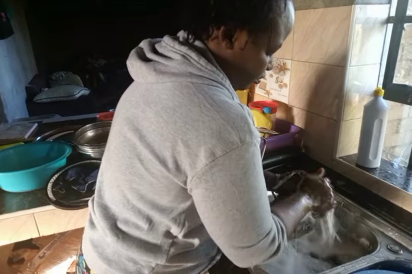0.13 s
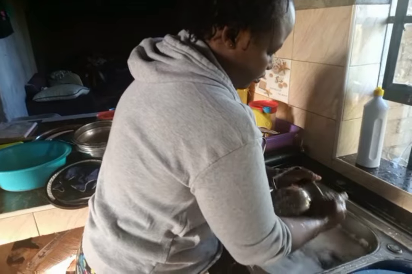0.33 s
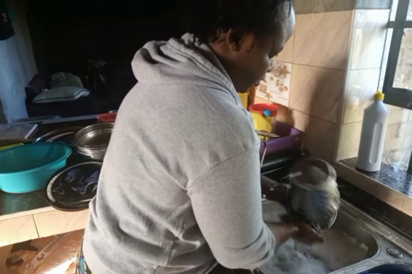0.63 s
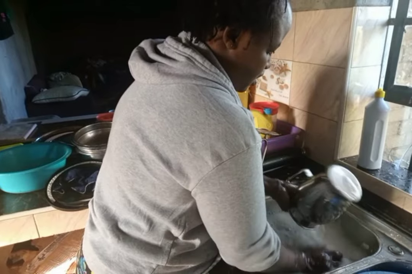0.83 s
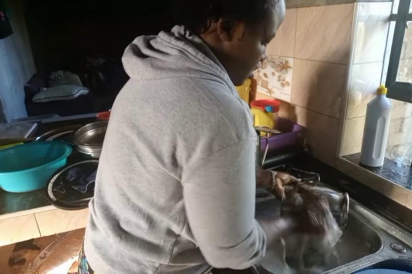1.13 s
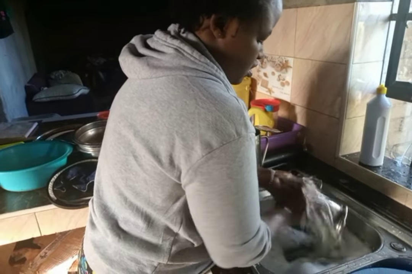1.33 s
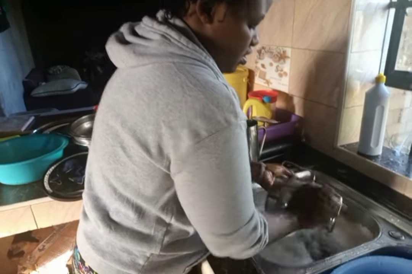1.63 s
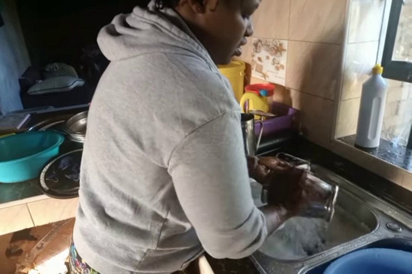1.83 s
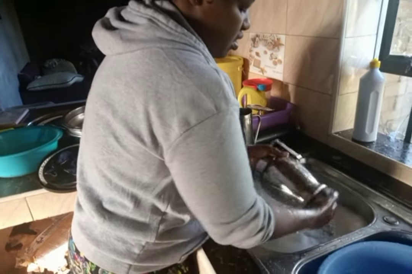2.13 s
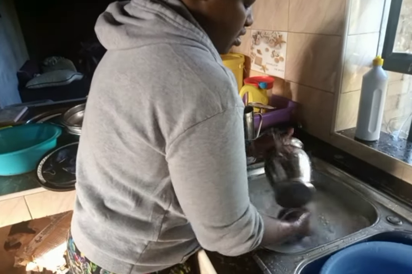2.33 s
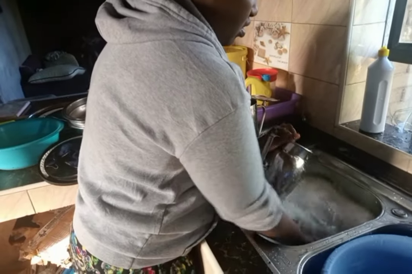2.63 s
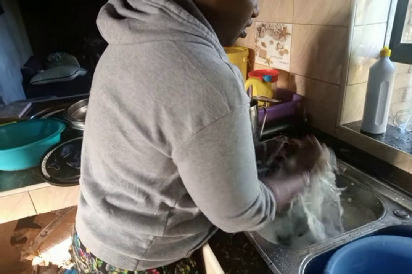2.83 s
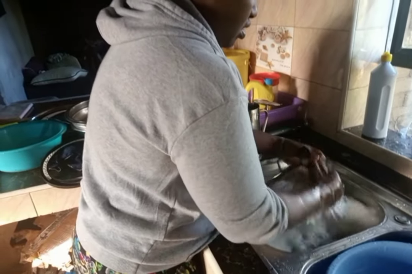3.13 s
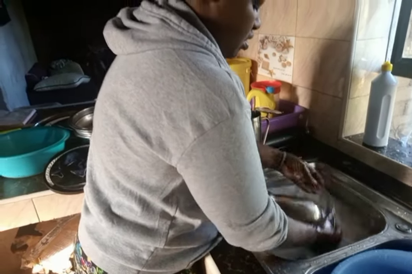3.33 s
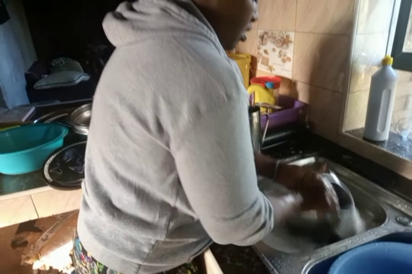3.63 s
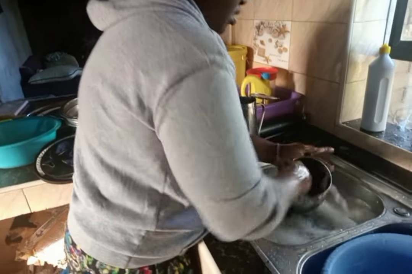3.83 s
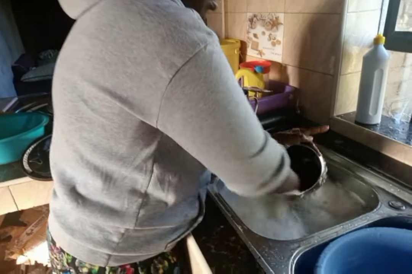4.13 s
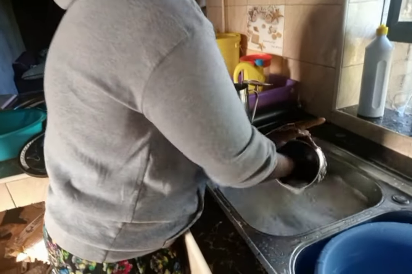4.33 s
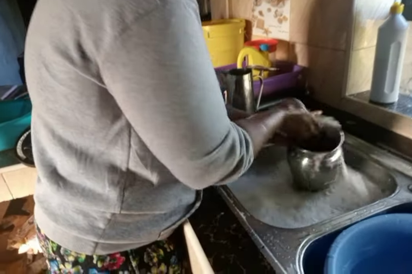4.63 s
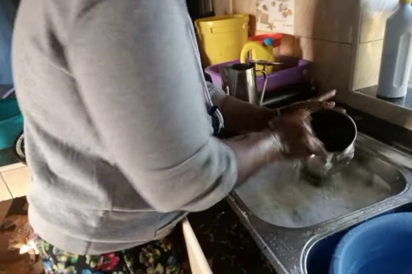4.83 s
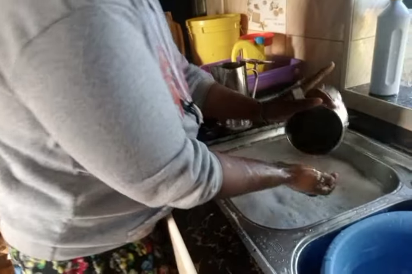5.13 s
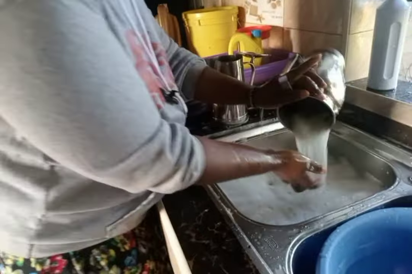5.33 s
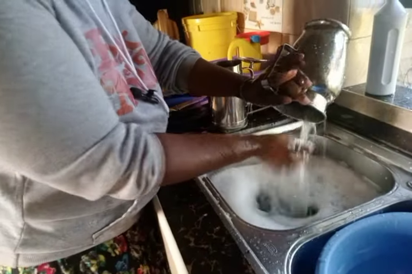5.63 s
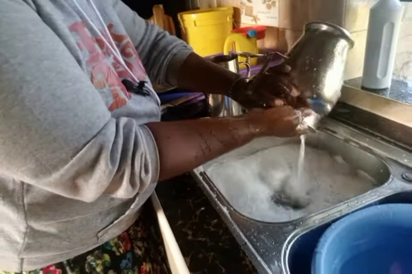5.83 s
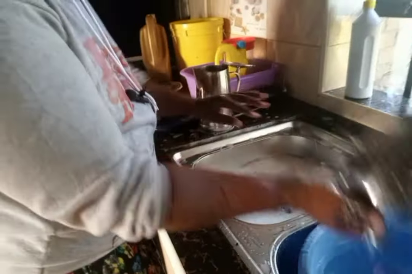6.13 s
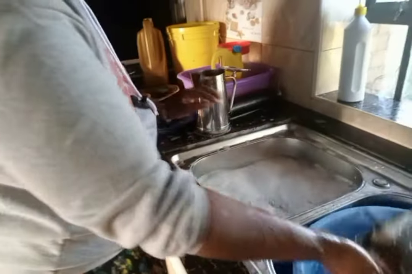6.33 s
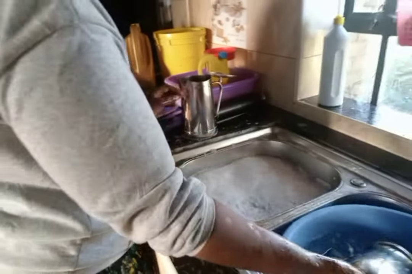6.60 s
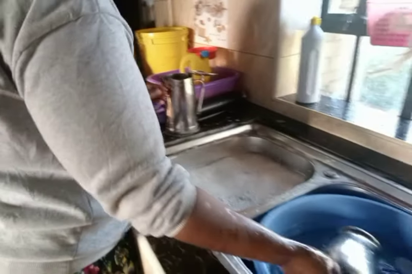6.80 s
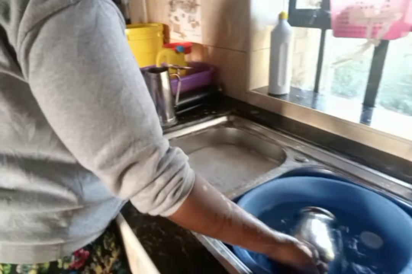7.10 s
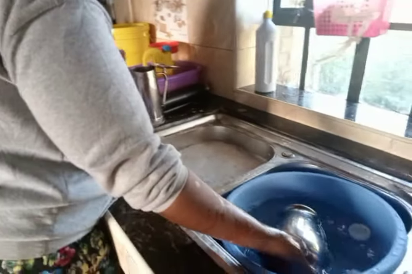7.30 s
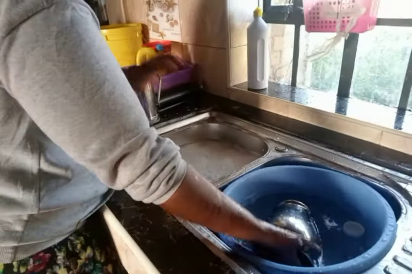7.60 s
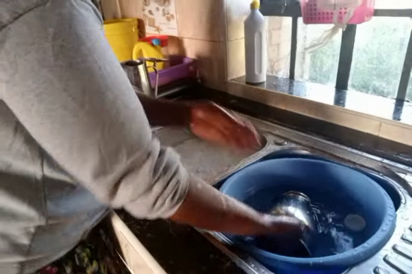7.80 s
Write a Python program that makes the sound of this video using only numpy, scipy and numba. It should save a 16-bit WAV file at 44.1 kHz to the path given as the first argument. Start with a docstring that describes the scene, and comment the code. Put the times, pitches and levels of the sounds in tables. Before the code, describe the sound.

A wet metal jug is scrubbed in a soapy sink, sloshed and knocked, emptied with a short splash, then dunked and thumped in a plastic basin.

```python
"""A steel jug is scrubbed by hand in soapy water, tipped out and dunked in a plastic basin; one close microphone.
Suds are tiny pops in flickering noise; the jug's air is resonant noise plus decaying sines at each knock.
Splashes are crowds of rising sines over coloured noise; bursts are noise decays, single bubbles sine decays.
The wall sings, clinks and hums in its modes, the basin booms and thuds, and a short room tail follows each hit.
Between moves the sound falls nearly silent."""
import sys
import numpy as np
from scipy import signal
from scipy.fft import rfft, irfft
from scipy.io import wavfile
from scipy.ndimage import uniform_filter1d
from numba import njit

SR = 44100
rng = np.random.default_rng(int(sys.argv[2]) if len(sys.argv) > 2 else 0)


def waveform_to_disk(signal):
    """Save audio, clipped to [-1, 1], as 16-bit WAV at the path in sys.argv[1]."""
    frames = np.transpose(np.atleast_2d(signal))
    scaled = np.clip(frames, -1, 1) * 32767
    samples = np.round(scaled).astype(np.int16)
    wavfile.write(sys.argv[1], SR, samples)


N = 351036

# Event and layer levels, and some decay times, are nominal: each function trims its own.
# knocks on the jug: start_s, level_db, air_pitch_hz, rattle_db (re knock), t60_s
JUG_KNOCKS = [(0.099, -41, 340.6, 9, 0.1), (0.202, -34, 312, -7, 0.13), (0.331, -36.5, 364, -17.5, 0.051),
              (0.395, -54, 520, 16.5, 0.089), (0.474, -37.5, 292.7, -23, 0.2),
              (0.756, -33.5, 317.5, -17, 0.18), (0.807, -22, 485, -9, 0.066),
              (0.868, -20.5, 488, -5.5, 0.066), (0.949, -41.5, 494, 3, 0.12), (1.006, -37.5, 500, 6, 0.15),
              (1.042, -10.5, 460, -32.5, 0.054), (1.265, -43, 491, -12, 0.11),
              (1.412, -40.5, 286, 2, 0.092), (1.944, -34.5, 310, -6.5, 0.13), (2.18, -31, 329, -16, 0.11),
              (2.322, -37, 359.5, 0, 0.13), (2.398, -45, 488, -16, 0.12), (2.471, -42, 473, -12, 0.049),
              (2.559, -44, 460, 11, 0.15), (2.723, -23, 469, -9, 0.046), (2.765, -24.5, 462, -1.5, 0.044),
              (2.794, -23.5, 569, -20, 0.032), (3.275, -29, 282.3, -16, 0.2),
              (3.388, -48.5, 267.4, -19, 0.13), (3.515, -51, 595, 13, 0.12), (3.59, -18.5, 355, -29, 0.092),
              (3.82, -31, 385, -14, 0.12), (3.931, -33.5, 485, -23, 0.12), (4.179, -40.5, 450.4, 1, 0.21),
              (4.213, -30.5, 422, -5.5, 0.086), (4.256, -26, 432.5, -11, 0.057),
              (4.325, -36, 419, 4.5, 0.081), (4.53, -46, 295, 2.5, 0.58), (4.647, -36.5, 338.5, -13, 0.24),
              (4.72, -35.5, 414.6, -13, 0.33), (4.946, -49.5, 289, 14, 0.095),
              (5.589, -44.5, 327.4, 14, 0.18), (5.909, -36.5, 281.5, -21, 0.11),
              (6.573, -31, 483, -4, 0.057), (6.879, -47.5, 330.5, -1.5, 0.082),
              (7.015, -50, 483, -3, 0.091), (7.113, -19, 497, -10, 0.023), (7.163, -35, 539, -8, 0.091),
              (7.312, -37, 462, -1, 0.12), (7.405, -35.5, 454, 3, 0.26), (7.425, -28, 245.5, -21, 0.25),
              (7.549, -23, 265.4, -21, 0.18), (7.734, -30, 365, -5, 0.055), (7.792, -29, 463.5, 11, 0.043),
              (7.908, -30.5, 367, 3.5, 0.16)]
# drops and films of water bursting: start_s, level_db, body_db (re burst)
WATER_BURSTS = [(0.0404, -33, -7), (0.6697, -24.5, -17), (0.8693, -28, -7), (1.0724, -40, -3),
                (1.0869, -34, -7), (1.2276, -28, -15), (1.2695, -29, -17), (1.3359, -34, -17),
                (1.407, -28, -17), (1.5674, -32, -11), (1.896, -19.5, -37), (2.5345, -33, -4),
                (2.549, -24, -16), (2.668, -33.5, -4), (2.7496, -34, 2), (2.8005, -36, 2),
                (2.8856, -32, 0.5), (2.9362, -28, 1), (3.015, -25, -7), (3.044, -29, -10), (3.095, -28, 0),
                (3.2525, -38, -13), (3.28, -34, -14), (3.343, -36.5, -12), (3.6366, -34, 5),
                (3.8791, -39, -7), (3.931, -31.5, -23), (4.1533, -44.5, -8), (4.1744, -28, -14),
                (4.2263, -31, -7), (4.2873, -37, -2), (4.3165, -32, 2.5), (4.4184, -38.5, -19),
                (4.5057, -38.5, 1), (4.528, -32, 3), (4.6664, -27, -2), (4.7506, -29, -17.5),
                (4.801, -21.5, -20), (4.9057, -40, -4), (4.9458, -44, 3), (5.3106, -58, -27.5),
                (5.573, -36, 7.5), (5.5992, -24.5, 2.5), (5.6282, -20.5, 1), (5.658, -21, -11),
                (5.7345, -26.5, 3), (5.8092, -27, 3), (5.9273, -30, -10.5), (6.035, -44, -20.5),
                (6.0646, -51, -20), (6.1746, -51.5, -30), (6.2764, -47.5, -11.5), (6.342, -22.5, -30),
                (6.4021, -16.5, -16), (6.4762, -35, -17), (6.572, -52.5, 9), (6.945, -51, -10),
                (7.1167, -33.5, -19), (7.1506, -35, -2), (7.1914, -25, -5), (7.3367, -20.5, -13),
                (7.425, -41, 6), (7.4524, -21.5, -11), (7.4924, -26.5, -13), (7.529, -28, -1),
                (7.5445, -27, 5), (7.5686, -28, -3), (7.6049, -23.5, 5), (7.6575, -28, -7),
                (7.7085, -24, -16), (7.796, -20, 0), (7.861, -31, 1), (7.8955, -27, -14),
                (7.9143, -16.5, -14), (7.9381, -12.5, -20)]
# single bubbles that sing: start_s, level_db, pitch_hz
SINGING_BUBBLES = [(0.041, -29, 1170), (0.803, -28, 1410), (0.866, -23, 1040), (0.893, -17, 1056),
                   (1.033, -23.5, 1350), (1.179, -31, 993), (1.569, -29.5, 1108), (1.602, -34, 1990),
                   (2.427, -36, 1900), (2.547, -28, 1080), (2.871, -38, 1060), (3.044, -33, 1797),
                   (3.095, -28.5, 2410), (3.516, -28.5, 1270), (3.59, -23, 1107), (3.635, -18.5, 1240),
                   (3.82, -35, 1485), (3.931, -37, 1416), (4.169, -41, 2180), (4.263, -34, 988),
                   (4.29, -30.5, 930), (4.328, -27.5, 1045), (4.53, -27.5, 980), (4.751, -27.5, 970),
                   (4.946, -46.5, 1035), (5.429, -50.5, 1060), (5.564, -34, 1186), (5.597, -20, 1736),
                   (5.631, -21.5, 1172), (5.729, -31, 1170), (6.402, -31, 3180), (6.572, -33, 870),
                   (6.686, -39, 2170), (6.877, -38, 836), (7.078, -38, 2200), (7.11, -32, 970),
                   (7.156, -27, 980), (7.179, -23.5, 3085), (7.251, -30, 1980), (7.369, -26.5, 1120),
                   (7.426, -25.5, 1200), (7.448, -22, 1876), (7.539, -26, 2270), (7.571, -30, 2300),
                   (7.604, -31, 1250), (7.657, -27.5, 1836), (7.773, -23, 1600), (7.807, -18, 1210),
                   (7.912, -26.5, 1810)]
# jug bumping the basin: start_s, level_db, pitch_hz, t60_s
BASIN_BUMPS = [(0.478, -38.5, 189, 0.21), (0.808, -30, 192, 0.1), (7.125, -39, 83.4, 0.12),
               (7.179, -33, 94.5, 0.24), (7.427, -12, 99, 0.079), (7.55, -7.5, 114, 0.07),
               (7.603, -12.5, 107, 0.077), (7.649, -22.5, 108, 0.17), (7.804, -21, 91.5, 0.13),
               (7.847, -17.5, 111, 0.23), (7.912, -29, 109, 0.15)]
# modes of the jug wall: pitch_hz, level_db, t60_s
WALL_MODES = [(740, -6, 0.24), (1110, -7.5, 0.32), (1849, -13, 0.18), (1946, -4.5, 0.18),
              (2128, -1.5, 0.088), (2630, -2.5, 0.16), (3070, -10, 0.063), (4330, -2.5, 0.15),
              (5420, -7, 0.12), (8800, -4.5, .12), (11550, -11, 0.13)]
# taps on the wall: start_s, level_db, brightness_db_per_octave (about 3000 Hz)
WALL_TAPS = [(3.277, -38, -1), (5.929, -26.5, 3.5), (6.6852, -50, -3), (7.1797, -32, 1)]
# spectrum of churned water: frequency_hz, density_db (per Hz)
SPLASH_SPECTRUM = [(290, -37), (500, 3.5), (539, -15.5), (626, -4), (1720, -4.5), (1890, -6), (2040, -6),
                   (2450, -5.5), (6500, -18), (8450, -50), (14300, -120)]
# spectrum of foam hiss: frequency_hz, density_db (per Hz)
SUDS_SPECTRUM = [(2350, -16), (4000, -2.5), (6140, -9.5), (6780, -6), (7530, -4.5), (8210, -1), (9010, 1.5),
                 (10100, -5.5), (13200, -3), (15200, -4.5), (16000, -4)]
# spectrum of the faint steady noise: frequency_hz, density_db (per Hz)
FLOOR_SPECTRUM = [(24, -29.5), (40, -2.5), (147, -0.5), (412, -5.5), (503, -5.5), (1020, -8), (2630, -8),
                  (3380, -14), (4570, -2.5), (5870, -13.5), (8000, -14), (9000, -6), (10200, -13),
                  (16000, -13.5)]
# a sliding hand or stream exciting one jug mode: start_s, level_db, pitch_hz, length_s
MODE_SINGS = [(0.286, -51.5, 2600, .07), (0.357, -54, 1754, 0.19), (0.417, -53, 2660, .1),
              (0.477, -63, 761, 0.29), (0.494, -45, 342, 0.12), (0.046, -57, 2550, 0.21),
              (.635, -54, 2590, 0.12), (2.164, -55.5, 1890, .08), (3.156, -56, 1880, .1),
              (3.277, -56, 2980, .08), (3.7, -59, 2590, .07), (7.3, -49, 484, 0.04),
              (0.773, -40, 517, 0.023), (2.71, -36.5, 477, .02), (3.085, -46, 1130, 0.034),
              (3.165, -49.5, 2890, 0.035), (3.181, -52, 755, 0.11), (3.274, -62, 14500, 0.065),
              (3.572, -49.5, 2290, 0.057), (3.644, -42, 1860, 0.034), (5.78, -46, 2470, 0.074),
              (5.81, -41, 1917, .07), (5.821, -48.5, 759, 0.13), (5.949, -59, 3030, .05),
              (6.687, -58, 3200, 0.028), (7.011, -56, 542, .07), (7.731, -45, 642, 0.028)]
# water sheeting off the jug: start_s, level_db, centre_hz, length_s
WATER_SHEETS = [(.92, -49, 5060, .08), (1.08, -49, 5260, 0.17), (6.6, -66, 4530, .16)]
# smooth rub against bubbly dipping and pouring: time_s, bubble_share (0-1)
BUBBLE_SHARE = [(0, .15), (.75, .15), (.8, .35), (1.2, .18), (2.3, .15), (2.7, .3), (5.4, .3), (6.9, .25),
                (7.1, .42), (7.96, .42)]
# sharp bright clicks, many at the front of a water burst: start_s, level_db, pitch_hz
BRIGHT_CLICKS = [(2.5484, -24, 7700), (2.668, -30, 13600), (3.0127, -42, 9200), (3.9346, -25, 9500),
                 (3.2525, -33, 10600), (3.343, -36, 9050), (4.174, -32, 12900), (4.288, -31, 13100),
                 (4.53, -36, 12000), (4.5085, -31, 11200), (4.7508, -17, 14400), (4.799, -22.5, 4580),
                 (5.27, -65, 4500), (5.6332, -23, 8700), (6.341, -26.5, 8030), (6.4027, -15, 3660),
                 (7.332, -25, 4070), (7.605, -18, 3330), (7.9136, -21, 9050), (7.939, -14, 9150)]
# moves of hand or jug in water: start_s, hold_s, swell_db (over the hold), splash_db,
# upper_splash_db (re splash), suds_db, jug_air_db, boom_db
WATER_MOVES = [(0, 0.767, -2.5, -51, 8.5, -46.5, -52, -57.5),
               (0.803, 0.055, -4, -30, -14.5, -60, -25.5, -39),
               (0.867, 0.056, -1.5, -27, -12.5, -45, -33.5, -40.5),
               (0.967, 0.085, -2, -37.5, -9, -52, -35.5, -51), (1.065, .14, -2.5, -41, -7.5, -46, -36, -53),
               (1.249, .15, -1, -41, -2, -45.5, -48, -64), (1.42, 0.19, -2.5, -49.5, 4, -42.5, -56, -56),
               (1.592, 0.24, -7, -56.5, 7, -45, -64, -61), (1.833, 0.52, 4.5, -60.5, 11, -48, -66, -63),
               (2.316, 0.047, 0.5, -37, -25, -49, -40.5, -62),
               (2.399, .11, -6.5, -39, -10.5, -52.5, -42.5, -56),
               (2.55, 0.097, -10.5, -42.5, 3.5, -44.5, -56, -49), (2.67, 0.028, 1, -56, 6, -58, -66, -62),
               (2.709, 0.11, -1, -43, -6, -52.5, -37.5, -50.5), (2.832, 0.24, 1, -45, 1.5, -48.5, -52, -58),
               (3.099, 0.21, 0.5, -51, 5.5, -53.5, -42.5, -55),
               (3.377, 0.031, -1, -48.5, -19, -62.5, -60, -61),
               (3.528, 0.052, 4.5, -41, -10.5, -61, -52, -70),
               (3.585, .13, -6.5, -37.5, -3.5, -51.5, -39, -53),
               (3.832, 0.072, -11.5, -43, -6.5, -56.5, -35.5, -70),
               (3.931, 0.037, -5.5, -56.5, 7, -63, -50.5, -77), (4.024, 0.078, -5, -80, 8, -72.5, -78, -82),
               (4.111, 0.035, -5.5, -55, -15.5, -72, -60, -78),
               (4.168, 0.18, 10, -54.5, -4, -62.5, -59, -74), (4.412, 0.13, 2, -58, 3.5, -63, -62, -73),
               (4.528, 0.092, -6, -47.5, 6, -47.5, -50, -61),
               (4.636, 0.15, 8, -57.5, 12, -51.5, -45.5, -79),
               (4.799, 0.11, -14.5, -50, 9.5, -48, -46.5, -63), (4.938, 0.053, -6, -59, 5, -63, -57, -55),
               (5.016, 0.096, -15.5, -76, 2.5, -75, -85, -64),
               (5.421, 0.18, 26.5, -66.5, -5, -76.5, -75.5, -83),
               (5.592, 0.13, -4.5, -29.5, -5, -39.5, -43.5, -43.5),
               (5.742, 0.18, -5, -44.5, 7.5, -43, -37.5, -44.5), (6.047, 0.052, 1.5, -75, 1, -74, -80, -73),
               (6.335, 0.062, -1, -67.5, 17, -51.5, -58, -63), (6.397, .04, 4, -54.5, -1, -58, -62, -59),
               (6.443, 0.039, -8, -48.5, 3, -56, -53, -50), (6.598, 0.093, -19, -50, -20, -63.5, -37, -48),
               (6.682, 0.034, -9, -68, 1, -64, -70, -60), (6.883, 0.057, -1, -54, -17.5, -67, -55.5, -72.5),
               (6.942, 0.19, 3, -59, 0.5, -64, -62, -70), (7.117, 0.086, 5, -44, -5, -59, -36.5, -38),
               (7.235, 0.084, -3, -44, 0, -54, -44, -41.5),
               (7.339, 0.067, -7, -46.5, 13.5, -41.5, -48, -45),
               (7.423, 0.065, 0, -42.5, 0, -48, -28, -30.5),
               (7.559, 0.084, -4.5, -39, 1.5, -46, -26.5, -27),
               (7.652, 0.13, -0.5, -46, 7, -44, -44, -38.5), (7.794, 0.047, -6, -24, -7, -33.5, -53, -25),
               (7.862, .1, 1, -34.5, -0.5, -43, -34, -37)]
# sponge strokes over the jug: start_s, length_s, suds_db, fineness_db
SPONGE_STROKES = [(0.04, 0.1, -40.5, 8), (0.17, 0.24, -42, 7.5), (0.382, 0.22, -39, 11.5),
                  (0.624, .11, -42, 11), (1.222, 0.18, -43, 10.5), (1.528, 0.29, -48, 15),
                  (1.867, .12, -39.5, 3), (2.038, 0.32, -38.5, 9.5)]

FLOOR_DB = -81
ROOM_T60_S, ROOM_DB = 0.23, -8.5
TOP_HZ = 15900
GATE_DB, GATE_SLOPE = -66, 0.5  # suppression starts below this level, with this power
SPRAY_FINE_DB = -2  # fineness of suds thrown up without the sponge
BURST_T60_S, PLINK_T60_S, CLICK_T60_S = 0.062, 0.048, 0.0027
RISE_DB_PER_S, FALL_DB_PER_S = 2600, 289.5  # slopes into and out of every move
SPATTER_DB, SPATTER_SPREAD_DB, SPATTER_T60_S = 11, 3.5, 0.013  # chance bursts; level over the suds


def undb(db):
    """Amplitude is the exponential of level: 20 dB is a factor of ten."""
    return 10 ** (np.asarray(db) / 20)


def unit(x):
    """Normalisation to unit rms."""
    return x / np.sqrt(np.mean(x ** 2))


def noise():
    """White Gaussian noise, equal in power at all frequencies."""
    return rng.standard_normal(N)


def colour(x, points):
    """Linear filtering: weights the spectrum by (Hz, dB) points on a log frequency axis; rms 1."""
    hz, db = np.transpose(points)
    grid = np.maximum(np.fft.rfftfreq(N, 1 / SR), 1)
    gain = undb(np.interp(np.log(grid), np.log(hz), db))
    return unit(irfft(rfft(x) * gain, N))


def walk(rate):
    """Slow modulation: random levels held 1 / rate s and smoothed twice; spread near 1."""
    hold = int(SR / rate)
    steps = np.repeat(rng.standard_normal(N // hold + 1), hold)
    smooth = uniform_filter1d(uniform_filter1d(steps, hold), hold)
    return 1.54 * smooth[:N]


@njit
def resonate(x, hz, q):
    """Driven resonance: a state-variable band-pass whose centre may move every sample."""
    out, band, low, damping = np.empty(len(x)), 0., 0., 1 / q
    for i in range(len(x)):
        g = np.tan(np.pi * hz[i] / SR)
        v = (band + g * (x[i] - low)) / (1 + g * (g + damping))
        band, low, out[i] = 2 * v - band, low + 2 * g * v, damping * v
    return out


@njit
def rings(s, size, hz, t60, glide, length):
    """Free decay: sines swell over one cycle, fade by 60 dB in t60 and shift in pitch by the glide share."""
    out = np.zeros(length)
    for k in range(len(s)):
        start, count, phase = int(s[k] * SR), int(t60[k] * SR), 0.
        fade, amplitude = 1000 ** (-1 / max(count, 1)), size[k]
        for i in range(min(count, length - start)):
            phase += 2 * np.pi * hz[k] * (1 + glide[k] * i / count) / SR
            amplitude *= fade
            out[start + i] += amplitude * np.sin(phase) * min(phase / (2 * np.pi), 1.)
    return out


def fades(s, db, t60, rise=0.0041):
    """Exponential decay: an envelope of dying events, with onsets smoothed over the rise time (s)."""
    out = np.zeros(N)
    for start, size, ring in zip(s, undb(db), t60):
        part = out[int(start * SR):int((start + ring) * SR)]
        part += size * undb(-60 * np.arange(len(part)) / SR / ring)
    return uniform_filter1d(out, max(int(rise * SR), 1))


def curves(table):
    """Linear interpolation of each column against the times in the first."""
    s, *columns = np.transpose(table)
    t = np.arange(N) / SR
    return [np.interp(t, s, column) for column in columns]


def bubbles(count, lo_hz, hi_hz, cycles, spread_db):
    """Superposition of many bubble decays, some much louder, each rising in pitch as it dies; rms 1."""
    when, pitch, big, life = rng.random((count, 4)).T
    hz = lo_hz * (hi_hz / lo_hz) ** pitch
    size = undb(-spread_db * np.log(1 - .97 * big))
    t60 = cycles * (.5 + life) / hz
    return unit(rings(when * N / SR, size, hz, t60, 0.14 * life, N))


def moves(db):
    """Power addition of overlapping moves: each rises fast, swells or ebbs while held and falls; gives dB."""
    t = np.arange(0, N, 32) / SR
    s, hold, swell_db = np.transpose(WATER_MOVES)[:3, :, None]
    rise = RISE_DB_PER_S * np.minimum(t - s, 0)
    held = swell_db * np.clip((t - s) / hold, 0, 1)
    fall = FALL_DB_PER_S * np.maximum(t - s - hold, 0)
    power = np.sum(undb(db[:, None] + rise + held - fall) ** 2, axis=0)
    return np.interp(np.arange(N) / SR, t, 10 * np.log10(power + 1e-14))


def quiet_floor():
    """Stationary coloured noise whose level wanders slowly."""
    return undb(FLOOR_DB + 2.2 * walk(7.)) * colour(noise(), FLOOR_SPECTRUM)


def room_tail(hits):
    """Reverberation: tiles and sink walls answer each hit with exponentially dying noise."""
    t = np.arange(int(ROOM_T60_S * SR)) / SR
    echo = rng.standard_normal(len(t)) * undb(-60 * t / ROOM_T60_S) * (t > .004)
    echo = echo / np.sqrt(np.sum(echo ** 2))
    return undb(ROOM_DB) * signal.fftconvolve(hits, echo)[:N]


def basin(db):
    """Low-frequency resonance: the tub booms under moving water, and thuds with falling pitch when bumped."""
    spectrum = [(25, -30), (55, -5.5), (110, -4.0), (190, -9), (300, -11.5), (600, -58.5)]
    boom = colour(noise() * undb(3. * walk(14)), spectrum)
    s, peak_db, hz, t60 = np.transpose(BASIN_BUMPS)
    thuds = rings(s, undb(peak_db), hz, t60, np.full(len(s), -.05), N)
    return undb(db - 3.5) * boom + thuds


def wall_hum():
    """Forced vibration: rubbing and running water drive the lower wall modes, each waxing on its own."""
    rub, out = noise(), 0
    for hz, db, t60 in WALL_MODES[:7]:
        mode = unit(resonate(rub, np.full(N, 1. * hz), hz * t60 / 2.5))
        out = out + undb(db + 6.2 * walk(16.)) * mode
    return unit(out)


def splash(db, upper_db, share):
    """Bubble resonance: bubbles of many sizes over churned water, with low and high bands levelled apart."""
    crowd = bubbles(count=4000, lo_hz=551.9, hi_hz=5977.0, cycles=87.0, spread_db=3.5)
    crowd = colour(crowd, [(500, 1.8), (6000, 12.0)])
    churn = noise() * undb(4.1 * walk(25))
    water = colour(np.sqrt(share) * crowd + np.sqrt(1 - share) * churn, SPLASH_SPECTRUM)
    low = signal.sosfilt(signal.butter(3, 1800, fs=SR, output="sos"), water)
    high = signal.sosfilt(signal.butter(3, 1800, "high", fs=SR, output="sos"), water)
    hum = undb(-5.0 - 24.0 * share) * wall_hum()  # fainter where bubbles prevail
    return undb(db - 6.0) * (unit(low) + undb(upper_db) * (unit(high) + hum))


def sheeting():
    """Band-limited noise: water sheeting off the jug swells and ebbs in one resonance."""
    out = np.zeros(N)
    for s, db, hz, length in WATER_SHEETS:
        part = out[int(s * SR):int((s + length) * SR)]
        count = 8 * 2048  # longer than any swish, so the resonance has settled
        tone = resonate(rng.standard_normal(count), np.full(count, 1. * hz), 10.0)
        shape = np.sin(np.pi * np.linspace(0, 1, len(part)) ** 0.91)
        part += undb(db) * shape * unit(tone[-len(part):])
    return out


def bursts(suds_db):
    """Impulsive excitation: water bursts give a sharp crack, a hissing tail and a lower body."""
    when, big, deep = rng.random((260, 3)).T
    spatter_db = suds_db[(when * N).astype(int)] + SPATTER_DB - SPATTER_SPREAD_DB * np.log(1 - .9 * big)
    spatter = [when * N / SR, spatter_db, -14. * deep]
    s, db, body_db = np.hstack([np.transpose(WATER_BURSTS), spatter])
    t60 = np.repeat([BURST_T60_S, SPATTER_T60_S], [len(WATER_BURSTS), len(when)])
    crack = fades(s, db - 10.0, np.full(len(s), .005)) + fades(s, db - 12.5, t60)
    body = fades(s, db + body_db - 9.0, t60)
    return crack * colour(noise(), SUDS_SPECTRUM) + body * colour(noise(), SPLASH_SPECTRUM)


def plinks():
    """Bubble oscillation: each singing bubble is born with a smaller, higher neighbour."""
    s, db, hz = np.transpose(SINGING_BUBBLES)
    t60 = np.full(len(s), PLINK_T60_S)
    late, up = rng.random((len(s), 2)).T
    sung = rings(s, undb(db - 5.5), hz, t60, np.full(len(s), .06), N)
    neighbour_hz = hz * (1.1 + .4 * up)
    sung += rings(s + 0.0077 * late, undb(db - 7.0), neighbour_hz, 0.21 * t60, np.full(len(s), .1), N)
    # a fast random waver roughens the plinks
    return sung * undb(2 * walk(200))


def bright_clicks():
    """Impulsive click: a few cycles with a spray of bright noise."""
    s, db, hz = np.transpose(BRIGHT_CLICKS)
    t60 = np.full(len(s), CLICK_T60_S)
    spray = unit(np.diff(noise(), prepend=0))  # differentiation tilts the noise upward
    click = rings(s, undb(db + 2.5), hz, t60, np.zeros(len(s)), N)
    return click + fades(s, db - 1.0, 1.2 * t60, rise=.0002) * spray


def sings():
    """Frictional excitation: one mode comes up fast and ebbs, wavering as the drive is uneven."""
    out = np.zeros(N)
    waver, drift = undb(3.7 * walk(60)), 1 + 0.0025 * walk(40)
    for s, db, hz, length in MODE_SINGS:
        span = slice(int(s * SR), int((s + length) * SR))
        shape = np.sin(np.pi * np.linspace(0, 1, span.stop - span.start) ** 0.55)
        tone = np.sin(2 * np.pi * hz * np.cumsum(drift[span]) / SR)
        out[span] += undb(db + 3.0) * shape * waver[span] * tone
    return out


def clinks():
    """Modal superposition: a tap sets all wall modes going in uneven balance; the wet hand damps them."""
    s, db, tilt_db = np.transpose(WALL_TAPS)
    hz, mode_db, t60 = np.transpose(WALL_MODES)
    slope = tilt_db[:, None] * np.log2(hz / 3000)
    uneven = 2 * rng.standard_normal(slope.shape)
    size = undb(db[:, None] + mode_db + slope - 9.5 + uneven)
    starts, pitches = np.repeat(s, len(hz)), np.tile(hz, len(s))
    damped_t60 = 0.34 * np.tile(t60, len(s))
    return rings(starts, size.ravel(), pitches, damped_t60, np.zeros(size.size), N)


def jug(db, hz):
    """Cavity resonance: sloshing water keeps the air hooting; knocks ring it and rattle the wall."""
    slosh = noise() * undb(4.8 * walk(22))
    hoot = unit(resonate(resonate(slosh, hz, 3.2), hz, 3.2))
    hoot += 0.6 * unit(resonate(noise(), np.full(N, 330.), 1.))
    hoot += 0.14 * unit(resonate(slosh, np.full(N, 235.), 3.0))
    s, peak_db, air_hz, rattle_db, t60 = np.transpose(JUG_KNOCKS)
    knocks = rings(s, undb(peak_db), air_hz, t60, np.full(len(s), .03), N)
    spectrum = [(200, -22.5), (600, -11), (1000, 5.5), (2000, -9.5), (5000, -20.5), (16000, -31.5)]
    rattle = fades(s - .002, peak_db + rattle_db - 8.0, 0.77 * t60) * colour(noise(), spectrum)
    return undb(db - 5.5) * hoot + knocks + rattle


def scrub(spray_db):
    """Power addition of strokes that swell and ebb over the spray; gives suds level and fineness in dB."""
    t = np.arange(N) / SR
    power = undb(spray_db) ** 2
    fine = power * SPRAY_FINE_DB
    for s, length, db, fine_db in SPONGE_STROKES:
        arch = np.abs(np.sin(np.pi * np.clip((t - s) / length, 0, 1) ** .9)) ** 1.2
        stroke = undb(2 * db) * arch * (t < s + length)
        power, fine = power + stroke, fine + stroke * fine_db
    return 10 * np.log10(power), fine / power


def suds(db, fine_db):
    """Foam acoustics: tiny pops merge in a flickering hiss; finer foam hisses higher."""
    pops = bubbles(count=16000, lo_hz=4070.0, hi_hz=14400.0, cycles=15.0, spread_db=6.5)
    foam = colour(0.33 * pops + noise() * undb(2. * walk(30)), SUDS_SPECTRUM)
    top = signal.sosfiltfilt(signal.butter(3, 10500, "high", fs=SR, output="sos"), foam)
    return undb(db - 1.5) * (foam + (undb(fine_db) - 1) * top)


def scene():
    """Superposition: shared moves set the water layers, hits gain a room tail, and all pressures add."""
    low_db, upper_re_db, spray_db, hoot_db, tub_db = np.transpose(WATER_MOVES)[3:]
    splash_db, air_db, boom_db = moves(low_db), moves(hoot_db), moves(tub_db)
    upper_db = moves(low_db + upper_re_db) - splash_db
    suds_db, fine_db = scrub(moves(spray_db))
    # the air in the jug slides from the pitch of one knock to that of the next
    air_hz = curves(JUG_KNOCKS)[1]
    share = curves(BUBBLE_SHARE)[0]
    hits = jug(air_db, air_hz) + clinks() + bright_clicks() + bursts(suds_db) + plinks()
    water = splash(splash_db, upper_db, share) + suds(suds_db, fine_db) + basin(boom_db) + sheeting()
    mono = hits + room_tail(hits) + water + sings()
    return np.tile(mono, (2, 1))


def record(dry):
    """Band limits and expansion: deep bass is cut, faint sound pushed down, a floor added, the top cut."""
    thin = signal.sosfilt(signal.butter(2, 60., "high", fs=SR, output="sos"), dry)
    loud = np.sqrt(np.abs(uniform_filter1d(thin ** 2, int(0.015 * SR))) + 1e-18)
    gated = thin * np.minimum(loud / undb(GATE_DB), 1) ** GATE_SLOPE
    top_cut = signal.ellip(10, .2, 60, TOP_HZ, fs=SR, output="sos")
    return signal.sosfilt(top_cut, gated + quiet_floor())


dry = scene()
out = record(dry)
waveform_to_disk(out)
```